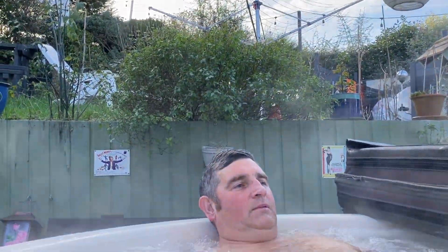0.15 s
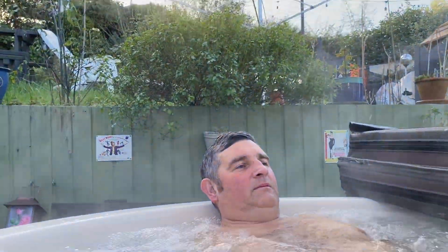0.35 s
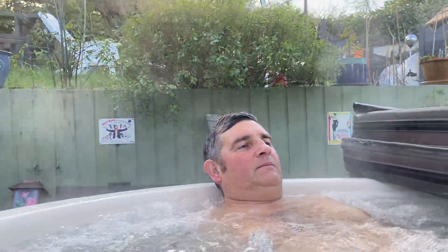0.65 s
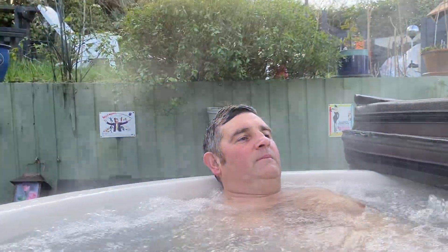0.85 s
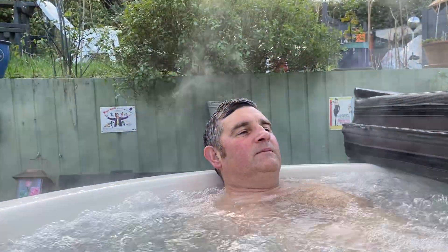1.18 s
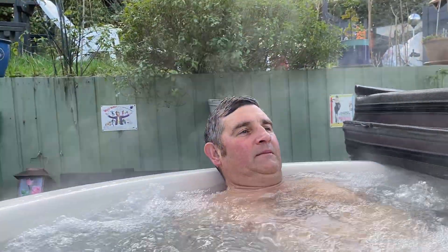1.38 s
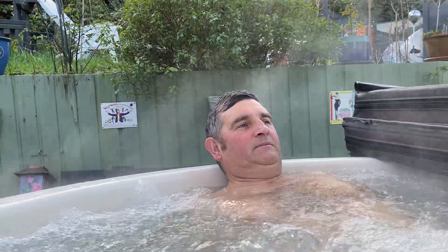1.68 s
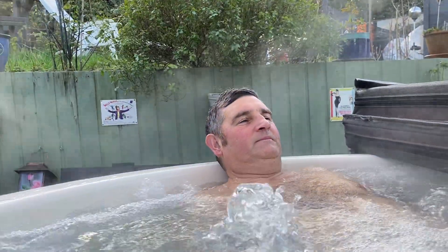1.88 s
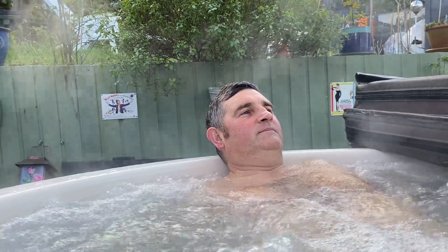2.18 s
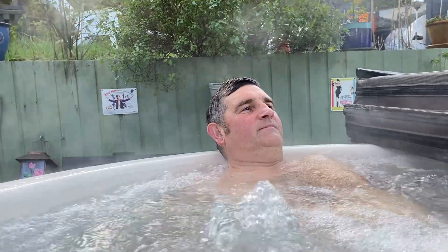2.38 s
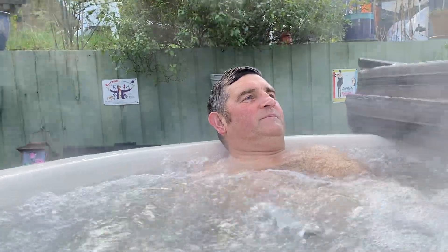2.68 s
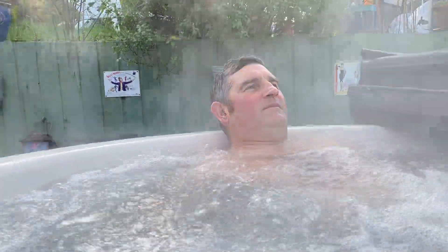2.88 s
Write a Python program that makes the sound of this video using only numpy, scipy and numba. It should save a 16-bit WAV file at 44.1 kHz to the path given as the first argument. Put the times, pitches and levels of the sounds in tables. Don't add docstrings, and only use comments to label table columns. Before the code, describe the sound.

Steady turbulent bubbling from a hot tub outdoors, heard close through a stereo phone microphone: deep gulps and sharper pops scattered throughout, light fizzing spray, tiny snaps and drops, with a low motor hum beneath.

```python
import sys
import numpy as np
from scipy import signal
from scipy.fft import rfft, irfft, next_fast_len
from scipy.io import wavfile
from numba import njit

SR = 44100
rng = np.random.default_rng(int(sys.argv[2]) if len(sys.argv) > 2 else 0)


def bounce(signal):
    frames = np.transpose(np.atleast_2d(signal))
    limited = np.clip(frames, -1, 1)
    pcm = np.round(limited * 32767).astype(np.int16)
    wavfile.write(sys.argv[1], SR, pcm)


def rack_gain(trim_db):
    fader = np.asarray(trim_db, float)
    return 10 ** (fader / 20)


N = 134505

PUMP_TONE_HZ = [99.8, 198.6, 415, 2493]
# level/dB rms, wobble/dB
PUMP_TONE_DB = [(-34, 1), (-38.5, 4.5), (-43, 0), (-64.5, 6.5)]
# t/s, surface level/dB, deep rumble swell/dB, gurgle/dB
CHURN = [(0.0, -33.5, -11, -4), (0.3, -33.5, -43, -4.5), (0.35, -32.5, -41, -6), (0.42, -33, -36, -3),
         (0.46, -34, -36, -3.5), (0.76, -33, -27, -4), (0.78, -34, -39, -5), (0.96, -33, -26, -5.5),
         (1.37, -33.5, -29, -4.5), (1.65, -34, -15, -2), (1.67, -32.5, -20, -4.5), (2.1, -33, -39, -4.5),
         (2.19, -33.5, -22, -4.5), (2.61, -33, -33, -6), (2.9, -33, -27, -3.5), (3.05, -32.5, -29, -6)]
# f/Hz, density/dB per Hz
ROAR_SPECTRUM = [(15, -47), (25, -14.5), (86, -0.5), (139, -3), (195, 2.5), (275, -3), (415, -4), (595, -9),
                 (1500, -21.5), (1950, -53), (3300, -120)]
# f/Hz, density/dB per Hz
HISS_SPECTRUM = [(500, 1), (1200, -3), (2500, -2), (4800, -7.5), (6500, -10), (9500, -19.5), (12500, -16),
                 (16000, -15)]
# rate/(1/s), low f/Hz, high f/Hz, life/cycles, level/dB
SWARMS = [
    (123, 155.8, 722, 13.3, -35),
    (160, 550, 1400, 15, -39),
    (200, 1200, 3200, 18, -45),
    (516, 2500, 8800, 13.8, -49),
    (1500, 7120, 14200, 12.5, -47.5),
]
# t/s, length/s, level/dB, middle f/Hz
SLOPS = [(0.041, 0.016, -41, 1300), (0.334, .025, -42, 1500), (1.374, 0.057, -43, 1500),
         (1.027, .055, -40.5, 1900), (1.085, .03, -43, 3320), (1.533, 0.032, -42, 1840),
         (1.596, 0.082, -40, 2200), (1.709, 0.06, -39.5, 2060), (1.978, 0.078, -45, 1600),
         (2.525, .09, -37, 1500), (2.91, 0.077, -45, 2580)]
# t/s, peak level/dB, f/Hz, life/cycles
GULPS = [(.1, -20.5, 323, 16), (.205, -19, 206, 13), (.255, -21, 258, 6.7), (.35, -20, 209, 14),
         (.45, -22, 192, 14), (.57, -25, 203, 6.4), (.83, -20, 332.6, 18), (.855, -20.5, 192, 10),
         (1.0, -15, 210, 5.5), (.67, -21, 92, 7), (1.385, -21, 98, 7), (1.45, -19.5, 191, 11.5),
         (1.49, -21, 72, 9.9), (1.585, -25, 324, 12), (1.695, -19, 286, 12), (1.75, -21, 177.6, 14),
         (2.21, -23, 244, 17), (2.275, -20, 219, 11), (2.425, -19, 181, 8.4), (2.56, -25, 310, 11),
         (2.905, -21, 370, 16), (2.985, -22, 353, 22)]
# t/s, peak level/dB, f/Hz, life/cycles, L-R/dB
POPS = [(.0455, -24, 1750, 9, 8), (0.0485, -19, 860, 14, -11), (.08, -25, 1350, 22, 0),
        (0.3328, -19, 1560, 16, 5), (.333, -23, 1080, 7, 11), (0.341, -20, 1580, 12, 5),
        (.346, -24, 900, 10, 5), (0.348, -34, 1550, 10, 3), (.532, -22, 776, 17, -3),
        (.98, -19, 625, 16, 0), (1.096, -27, 2550, 18, 0), (1.16, -26, 680, 9.9, 0),
        (1.561, -17, 490, 11, -2), (1.617, -28, 2220, 17, 0), (1.672, -31, 1880, 16, 0),
        (1.727, -27, 1950, 22, -5), (1.84, -20, 536, 16, 2), (1.905, -26, 1380, 14, 0),
        (2.028, -28, 2380, 14, 0), (2.083, -24, 960, 20, 0), (2.557, -26, 1080, 9, 2),
        (2.89, -17, 595, 8.2, -3), (2.02, -20, 930, 17, 1), (1.961, -19, 780, 8.7, -5),
        (2.599, -25, 1040, 14, 1), (.808, -23, 2040, 13, 4), (.813, -27, 2500, 16, 4),
        (1.036, -26, 1530, 18, 0), (1.064, -28, 1360, 19, 1), (1.19, -28, 1150, 14, -1),
        (1.989, -21.5, 2400, 16, 1), (2.0045, -15.5, 870, 7.6, 1), (2.03, -19, 1850, 12, 3),
        (2.044, -23, 1400, 12, 3), (2.376, -22, 816, 24, -14), (2.417, -27, 1540, 14, 8),
        (2.584, -16, 980, 9.7, .5), (2.596, -21, 1000, 14, 2)]
# t/s, peak level/dB, f/Hz, life/cycles, L-R/dB
DROPS = [(0.1633, -24, 4240, 18, 3), (0.1944, -24, 4810, 14, -2), (0.384, -23, 7390, 20, 1.0),
         (0.3882, -17, 5910, 11, 1.0), (0.9825, -24, 6800, 21, 0.5), (1.061, -27, 6980, 18, 0.5),
         (1.094, -22, 3700, 12, 1.5), (1.5963, -21, 6510, 16, 1.0), (1.968, -25, 4210, 14, 1.5),
         (2.03, -21, 6640, 18, 1.5), (2.5392, -26, 4080, 14, -1), (2.5714, -19.5, 6360, 16, -2),
         (2.031, -26, 3300, 8, 1), (2.65, -21, 3560, 26, -1), (2.6, -25, 4240, 18, 1.0),
         (2.6309, -25, 7250, 18, 0.0), (2.8235, -22.5, 4630, 12, 19)]
# t/s, peak level/dB, f/Hz, life/cycles
CHIRPS = [
    (.795, -30, 6250, 57),
    (1.19, -33.5, 6950, 82),
    (2.04, -29, 8400, 40),
    (2.634, -32, 6750, 69),
    (2.802, -33, 6500, 100),
]
# t/s, peak level/dB, f/Hz, life/cycles
TICKS = [(.166, -18, 8800, 5), (.171, -28, 10800, 6), (.193, -21, 12000, 7.3), (.33, -30, 11300, 5),
         (.384, -21, 11400, 4.3), (.45, -24, 11900, 5), (1.151, -17.5, 13000, 8), (1.3245, -20, 11500, 4),
         (1.3245, -15, 6500, 4.5), (1.9255, -23, 5700, 9), (1.893, -26, 8000, 5), (2.448, -25, 7500, 6),
         (2.502, -25, 7000, 6), (2.542, -24, 7000, 6), (1.565, -28, 10500, 6.6), (1.851, -21, 10500, 3),
         (1.927, -22, 8000, 3), (1.982, -33, 9500, 5), (1.995, -24, 11400, 4.3), (2.033, -28, 9500, 6),
         (2.309, -14.5, 10000, 4.4), (2.46, -23, 10500, 7.4), (2.6, -31, 13000, 6), (2.629, -28, 12100, 5),
         (2.855, -37, 10000, 5), (2.933, -34, 12500, 7.2)]
# f/Hz, likeness/(0-1)
PORT_LIKENESS = [(45, .82), (110, .86), (500, .5), (1500, .08), (2700, .42), (4300, .4), (5400, .05),
                 (6800, .65), (8500, .955)]
# f/Hz, phase/rad
RIGHT_LEAD = [(60, -0.067), (700, 0.89), (2200, 0.18), (3200, -1.3), (4000, -1), (4800, 0.086),
              (6400, -0.79)]
# f/Hz, L-R/dB
LEFT_BIAS = [(100, -1), (800, 0.5), (1200, 0.6), (3000, -0.5), (5000, 2.6), (6400, -1), (7500, 1),
             (9500, 0)]

ROAR_DB, HISS_DB = -24.5, -36.5
RUMBLE_TOP_HZ, RUMBLE_FOLLOWS, ROAR_FOLLOWS = 85, 0.87, 1
GURGLE_LOW_HZ, GURGLE_HIGH_HZ = 900, 3200
BUBBLE_RISE = 0.399
SIZE_SPREAD_DB, CLUMP_DB = 2, 2
SLOP_SPREAD_OCT, SLOP_CYCLES = 0.451, 17
SPLASH_DB, SPLASH_DECAY_S, SPLASH_BAND_HZ = -20.5, 0.015, (677, 3060)
POPS_DB, DROPS_DB = -3.5, -6
PUMP_WAVER_RAD = 1.34
LAG_FROM_HZ, COMB_HZ = 6970, 4150


def rms_one(x):
    return x / np.sqrt(np.mean(x ** 2) + 1e-20)


def at_hz(points, hz):
    table_hz, values = np.array(points).T
    return np.interp(np.log(hz), np.log(table_hz), values)


def drift(rate_hz):
    r = np.exp(-80 * np.pi * rate_hz / SR)
    slow = signal.lfilter([1], [1, -2 * r, r * r], rng.standard_normal(N // 40 + 2002))
    slow = slow[2000:]
    return np.interp(np.arange(N) / 40, np.arange(len(slow)), rms_one(slow - slow.mean()))


def bandpass(x, band_hz):
    return signal.sosfilt(signal.butter(2, band_hz, "band", fs=SR, output="sos"), x)


def pump():
    t = np.arange(N) / SR
    hum = np.zeros(N)
    for hz, (level_db, wobble_db) in zip(PUMP_TONE_HZ, PUMP_TONE_DB):
        height = np.sqrt(2) * rack_gain(level_db + wobble_db * drift(4.1))
        waver = PUMP_WAVER_RAD * np.sqrt(hz / 100) * drift(2.18)
        hum += height * np.sin(2 * np.pi * hz * t + waver)
    return hum


def banded_noise(spectrum, edges_hz, shared_db, own_db, extra_db):
    out = 0
    together = drift(29.0)
    white = rng.standard_normal((2, 2, N))
    for k, (low, high) in enumerate(zip(edges_hz, edges_hz[1:])):
        hz = np.sqrt(low * high)
        flicker_db = shared_db * together + own_db * drift(17.3)
        gain = rack_gain(at_hz(spectrum, hz) + flicker_db + extra_db(hz))
        out = out + gain * bandpass(white[k % 2], [low, high])
    return rms_one(out)


def water_roar(churn_db, swell_db):
    def follow(hz):
        return RUMBLE_FOLLOWS * swell_db if hz < RUMBLE_TOP_HZ else ROAR_FOLLOWS * churn_db
    return rack_gain(ROAR_DB) * banded_noise(ROAR_SPECTRUM, np.geomspace(24, 1500, num=15), 0.62, 1.67, follow)


def surface_hiss(churn_db, gurgle_db):
    def gurgle(hz):
        return gurgle_db if GURGLE_LOW_HZ < hz < GURGLE_HIGH_HZ else 0
    noise = banded_noise(HISS_SPECTRUM, np.geomspace(600, 17000, num=13), 0.87, 1.0, gurgle)
    return rack_gain(HISS_DB + churn_db) * noise


@njit
def add_bubbles(out, start, height, hz, cycles, rise, rate):
    for k in range(len(start)):
        length = cycles[k] / hz[k] * rate
        phase = 0.0
        for i in range(min(int(1.5 * length), len(out) - start[k])):
            age = i / length
            phase += 2 * np.pi * hz[k] * (1 + rise[k] * age) / rate
            envelope = 1.7 * (1 - np.exp(-16 * age)) * np.exp(-4 * age)
            out[start[k] + i] += height[k] * np.sin(phase) * envelope


def swarms(churn_db, gurgle_db):
    out = np.zeros((2, N))
    traits = rng.random((4, N))
    for per_s, low_hz, high_hz, cycles, level_db in SWARMS:
        gurgling = GURGLE_LOW_HZ < np.sqrt(low_hz * high_hz) < GURGLE_HIGH_HZ
        clumps_db = CLUMP_DB * drift(8) + gurgle_db * gurgling
        chance = per_s * rack_gain(churn_db + clumps_db) / SR
        for side in range(2):
            crowd = np.zeros(N)
            start = np.flatnonzero(rng.random(N) < chance)
            size, pitch, life, climb = traits[:, start]
            hz = low_hz * (high_hz / low_hz) ** pitch
            height = rack_gain(-SIZE_SPREAD_DB * np.log(size + 0.04)) * low_hz / hz
            add_bubbles(crowd, start, height, hz, cycles * (0.5 + life), BUBBLE_RISE * 2 * climb, SR)
            out[side] += rack_gain(level_db + churn_db) * rms_one(crowd)
    return out


def slops(count=40):
    out = np.zeros((2, N))
    for s, length_s, level_db, middle_hz in SLOPS:
        for side in range(2):
            when, size, life = rng.random((3, count))
            start = ((s + length_s * when) * SR).astype(np.int64)
            hz = middle_hz * 2 ** (SLOP_SPREAD_OCT * rng.standard_normal(count))
            height = rack_gain(level_db - 1.0 - 2.1 * np.log(size + 0.05))
            add_bubbles(out[side], start, height, hz, SLOP_CYCLES * (0.5 + life), BUBBLE_RISE * life, SR)
    return out


def splashes():
    s, peak_db = np.array(POPS)[:, :2].T
    hits = np.zeros(N)
    hits[(s * SR).astype(int)] = rack_gain(peak_db + SPLASH_DB)
    puff = signal.lfilter([1], [1, -np.exp(-1 / (SPLASH_DECAY_S * SR))], hits + 1e-18)
    return puff * rms_one(bandpass(rng.standard_normal((2, N)), SPLASH_BAND_HZ))


def single_bubbles(rows, rise, trim_db=0):
    out = np.zeros((2, N))
    s, peak_db, hz, cycles, *pan_db = np.transpose(rows)
    start = (s * SR).astype(np.int64)
    for side, share in enumerate((0.5, -0.5)):
        height = rack_gain(peak_db + trim_db + share * sum(pan_db))
        add_bubbles(out[side], start, height, hz, np.maximum(cycles, 2), np.full(len(s), rise), SR)
    return out


def near_bubbles():
    near = single_bubbles(GULPS, 0.19)
    near += single_bubbles(POPS, 0.13, POPS_DB)
    near += single_bubbles(DROPS, 0.11, DROPS_DB)
    near += single_bubbles(CHIRPS, 0.31)
    near += single_bubbles(TICKS, 0.033)
    return near


def ports(diffuse, direct):
    size = next_fast_len(N + 4096)
    hz = np.maximum(np.arange(size // 2 + 1) * SR / size, 1)
    a, b = rfft(diffuse, size)
    left, right = rfft(direct, size)
    alike = np.clip(at_hz(PORT_LIKENESS, hz), 0, 1)
    common = np.sqrt((1 + alike) / 2) * a
    opposed = np.sqrt((1 - alike) / 2) * b
    lead_rad = at_hz(list(RIGHT_LEAD) + [(LAG_FROM_HZ, 0)], hz)
    lead_rad = lead_rad + 2 * np.pi * np.maximum(hz - LAG_FROM_HZ, 0) / COMB_HZ
    bias = rack_gain(at_hz(LEFT_BIAS, hz) / 2)
    left = (common + opposed + left) * bias
    right = (common - opposed + right) / bias * np.exp(1j * lead_rad)
    return irfft([left, right], size)[:, :N]


def scene():
    s, surface, deep, gurgle = np.transpose(CHURN)
    t = np.arange(N) / SR
    churn_db = np.interp(t, s, surface - surface.mean())
    swell_db = np.interp(t, s, deep - deep.mean())
    gurgle_db = np.interp(t, s, gurgle - gurgle.mean())
    diffuse = water_roar(churn_db, swell_db) + surface_hiss(churn_db, gurgle_db)
    diffuse = diffuse + swarms(churn_db, gurgle_db) + slops() + splashes()
    return ports(diffuse, pump() + near_bubbles())


def band_limit(x):
    return signal.sosfilt(signal.butter(12, 15890, fs=SR, output="sos"), x)


def record(dry):
    mix = signal.sosfilt(signal.butter(4, 38, "high", fs=SR, output="sos"), dry)
    mix = signal.sosfilt(signal.ellip(10, 0.5, 70, 15750, fs=SR, output="sos"), mix)
    return band_limit(mix)


dry = scene()
out = record(dry)
bounce(out)
```